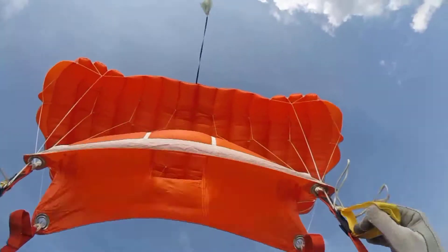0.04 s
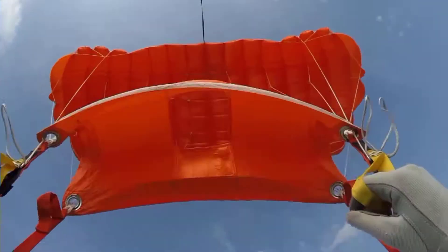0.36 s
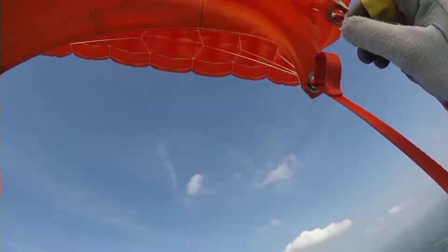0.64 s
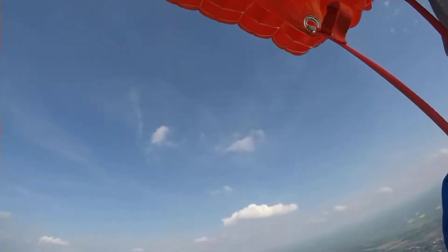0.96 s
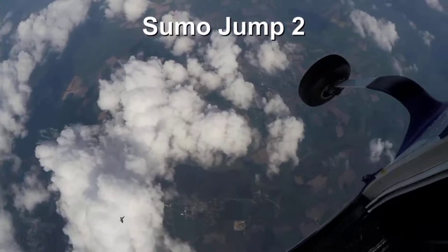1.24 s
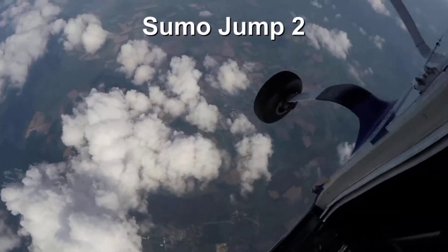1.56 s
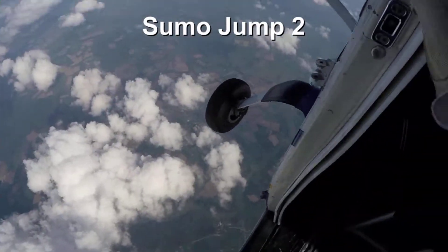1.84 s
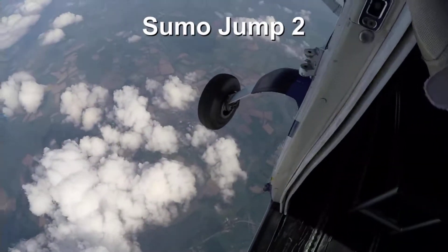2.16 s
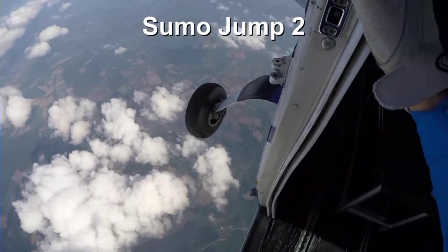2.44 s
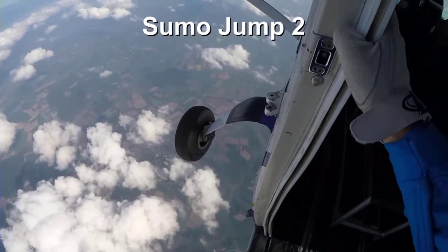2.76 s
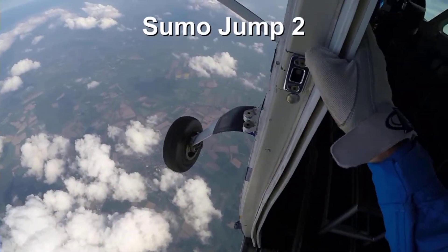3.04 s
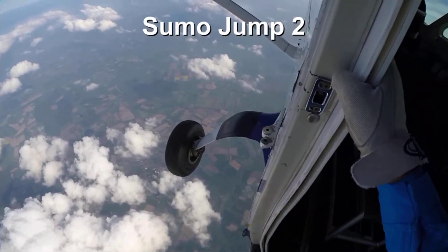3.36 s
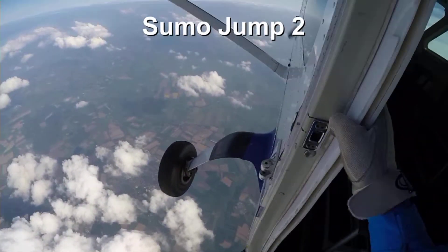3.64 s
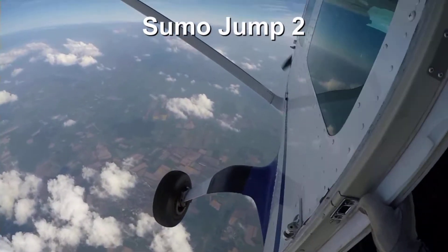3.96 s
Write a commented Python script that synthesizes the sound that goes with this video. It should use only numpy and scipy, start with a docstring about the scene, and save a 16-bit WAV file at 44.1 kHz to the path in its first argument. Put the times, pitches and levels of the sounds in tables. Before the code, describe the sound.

Wind thumps softly on the microphone under an open parachute while cloth rustles and snaps. It changes abruptly to a loud, steady rush buffeting the open door of a small aircraft in flight, with a propeller droning underneath.

```python
"""Gusts thump on a helmet camera under an open parachute; the slider's cloth rustles and snaps, and a
gloved hand slides along it. Then a hard cut to the open door of a small aircraft in flight: the
slipstream buffets and rushes, ringing in the door frame and the camera housing and howling briefly
on an edge, over the half-buried drone of the propeller."""
import sys
import numpy as np
from scipy import signal
from scipy.fft import rfft, irfft
from scipy.io import wavfile
from scipy.ndimage import uniform_filter1d

SR = 44100
rng = np.random.default_rng(int(sys.argv[2]) if len(sys.argv) > 2 else 0)


def inscribe(sig):
    """Save sig as 16-bit PCM at rate SR to the path in sys.argv[1].

    A 1-D sig is mono; a 2-D sig holds one channel per row.
    Samples are clipped to [-1, 1] before scaling.
    """
    pcm = np.round(np.clip(np.atleast_2d(sig).T, -1, 1) * 32767)
    wavfile.write(sys.argv[1], SR, pcm.astype(np.int16))


N = 176400
TIME = np.arange(N) / SR


def from_db(db):
    return 10 ** (np.asarray(db) / 20)


def in_time(rows):
    """One envelope per level column of a breakpoint table."""
    times, *columns = np.transpose(rows)
    return [np.interp(TIME, times, column) for column in columns]


def filtered_noise(gain_at):
    """White noise through a frequency response; rms 1."""
    hz = np.maximum(np.arange(N // 2 + 1) * SR / N, 1)
    x = irfft(rfft(rng.standard_normal(N)) * gain_at(hz), N)
    return x / np.sqrt(np.mean(x ** 2) + 1e-20)


def noise(colour):
    """Noise with a spectrum of (f/Hz, level/dB) points, falling steeply beyond both ends; rms 1."""
    points_hz, db = np.transpose(colour)

    def gain_at(hz):
        skirts = np.minimum(1, np.minimum(hz / points_hz[0], points_hz[-1] / hz)) ** 4
        return from_db(np.interp(np.log(hz), np.log(points_hz), db)) * skirts
    return filtered_noise(gain_at)


def resonance(centre_hz, width_hz):
    """A narrow, ringing band of noise; rms 1."""
    return filtered_noise(lambda hz: 1 / (1 + ((hz - centre_hz) / width_hz) ** 2))


def drift(rate_hz):
    """Random modulation up to about the given rate; rms 1."""
    return resonance(0, rate_hz)


def steadied(x, samples):
    """Evens out the chance swells of a rumble."""
    return x / np.sqrt(uniform_filter1d(x ** 2, samples) + 1e-9)


def swell(centre_s, width_s):
    """A bell-shaped rise and fall."""
    return np.exp(-.5 * ((TIME - centre_s) / width_s) ** 2)


def canopy_gusts():
    """Lumpy gusts hit the microphone; a faint treble hiss, like audio-coder noise, follows their peaks."""
    # gust envelopes: t/s, thump level/dB, rumble level/dB
    levels = [(0, -30, -34.5), (.15, -22, -28), (.2, -26, -30.5), (.26, -17.5, -31), (.32, -29, -29),
              (.41, -28.5, -33.5), (.44, -26, -25), (.49, -41, -34), (.65, -32, -33.5), (.75, -41, -37.5),
              (.79, -23.5, -42), (.82, -34, -40), (.86, -27.5, -36), (.96, -39.5, -44), (1.13, -32, -37.5),
              (1.21, -36, -40)]
    # spectra of the three layers: f/Hz, level/dB
    thump_colour = [(15, -15), (25, -2.5), (42, 4), (65, 1), (82, -12), (120, -26)]
    rumble_colour = [(70, -7), (100, -4.5), (145, 0), (185, -6), (230, -14.5), (280, -15.5), (345, -22.5),
                     (420, -34.5), (700, -38)]
    coder_hiss_colour = [(4000, -6), (8000, 0), (16000, -1)]
    thump_db, rumble_db = in_time(levels)
    gusts = from_db(thump_db) * steadied(noise(thump_colour), samples=2000)
    gusts += from_db(rumble_db) * steadied(noise(rumble_colour), samples=2000)
    coder_hiss = from_db(-36.5) * np.abs(gusts) ** 1.23 * noise(coder_hiss_colour)
    return gusts + coder_hiss


def canopy_airflow():
    """A soft bed of air streaming past the camera."""
    # airflow fading in: t/s, level/dB
    levels = [(0, -59), (.4, -46.5), (.7, -40), (.86, -43), (.97, -41), (1.21, -39.5)]
    # airflow spectrum: f/Hz, level/dB
    colour = [(300, 0.5), (450, -8), (700, -7.5), (1200, -6), (1500, -3), (2000, -3), (2700, -4.5),
              (3200, 0), (3600, -2.5), (4200, -14.5), (5000, -20.5), (5800, -11), (6400, -14),
              (7100, -21.5), (8700, -24.5), (10000, -30), (16000, -40)]
    air_db, = in_time(levels)
    return from_db(air_db + .8 * drift(rate_hz=40)) * noise(colour)


def cloth_rustle(flutter):
    """Cloth and lines rub; a thin squeak joins in partway."""
    # rubbing envelope: t/s, level/dB
    levels = [(0, -48), (.14, -45.5), (.2, -41), (.27, -42.5), (.36, -38), (.44, -33.5), (.53, -35.5),
              (.65, -38.5), (.75, -37), (.79, -44), (.86, -70)]
    # rubbing spectrum: f/Hz, level/dB
    colour = [(300, -10), (600, -12.5), (1000, -6.5), (1250, -4), (1500, -3), (2000, -3), (2700, -5.5),
              (3200, 1.5), (3600, -2), (4200, -17.5), (5000, -23), (5600, -15.5), (6000, -13), (6450, -19),
              (6900, -31), (9000, -34), (11000, -40), (16000, -48)]
    cloth_db, = in_time(levels)
    squeak = from_db(-13) * (TIME > .4) * resonance(centre_hz=6050, width_hz=280)
    return flutter * from_db(cloth_db) * (noise(colour) + squeak)


def cloth_flutter():
    """The fast, ragged gain of fluttering cloth, deepest at the start."""
    # flutter: t/s, rms depth/dB
    depths = [(0, 3.4), (.3, 3.1), (.45, 0.99), (.8, 1.1)]
    depth_db, = in_time(depths)
    return from_db(depth_db * drift(rate_hz=90))


def cloth_snaps():
    """Short snaps of the cloth, each a dull body with a bright edge."""
    # snaps: t/s, level/dB, edge against body/dB
    snaps = [(0.027, -35, -28), (0.034, -34, -31), (.181, -32.5, -14), (0.2056, -34.5, -3.5),
             (0.231, -30.5, -18), (.3097, -30, -20), (.318, -39, -8), (0.3338, -24.5, -16),
             (0.34, -24.5, -4), (.3716, -29, -15), (.384, -25, -22), (0.742, -25.5, -31),
             (0.8974, -30, -28)]
    # spectra of body and edge: f/Hz, level/dB
    body_colour = [(400, -15), (800, 0), (1400, -0.5), (2400, 1), (3400, 2), (4200, -17), (6000, -26),
                   (8000, -34)]
    edge_colour = [(4000, -8), (5500, 2), (6400, 8), (7500, -12), (8700, -16), (10000, -12), (12000, -20),
                   (16000, -26)]
    attack_s, decay_s = 0.00042, 0.0034
    body, edge = noise(body_colour), noise(edge_colour)
    out = np.zeros(N)
    for start_s, db, edge_db in snaps:
        age = np.maximum(TIME - start_s, 0)
        envelope = (1 - np.exp(-age / attack_s)) * np.exp(-age / decay_s)
        out += from_db(db) * envelope * (body + from_db(edge_db) * edge)
    return out


def glove_swish(flutter):
    """One bright swish as the glove slides along the fluttering cloth."""
    # swish spectrum: f/Hz, level/dB
    colour = [(4000, -10), (6500, -2), (7800, 4), (8500, -3), (9400, 1), (11200, -2), (12000, -8),
              (13000, -4), (14000, -13), (16000, -17)]
    return flutter * from_db(-54.5) * swell(centre_s=0.477, width_s=.05) * noise(colour)


def slipstream(blade_phase):
    """Air buffets, rumbles and rushes past the door; eddies, buffets and blades all shake the rush."""
    # layer envelopes: t/s, then level/dB of buffet, rumble, low rush, rush, hiss
    levels = [(1.21, -23, -24.5, -30, -24.5, -41), (1.5, -23, -23.5, -27.5, -24.5, -43),
              (1.75, -23.5, -24, -33.5, -23.5, -45.5), (2, -32, -23.5, -32, -25, -45),
              (2.2, -22.5, -24, -31.5, -24.5, -44), (2.7, -25, -26, -33, -25, -48),
              (3.3, -21.5, -25.5, -33, -24.5, -48), (3.7, -22, -27.5, -36, -24.5, -47.5),
              (4, -20.5, -29, -35.5, -25, -46.5)]
    # spectra of the five layers: f/Hz, level/dB
    buffet_colour = [(15, -25), (28, -2), (44, -4), (65, 2.5), (88, -0.5), (125, -4.5), (170, -12),
                     (300, -29)]
    rumble_colour = [(90, -7.5), (135, 2), (175, -1), (230, -3), (290, -6.5), (345, -16.5), (460, -20.5),
                     (600, -24.5), (900, -37)]
    low_colour = [(150, 2.5), (300, 1.5), (450, 0.5), (620, -2), (950, 0.5), (1250, -3.5), (1700, -5),
                  (3000, -35)]
    rush_colour = [(700, -9), (1250, -13.5), (1500, -3), (1900, -2.5), (2350, -3.5), (2850, -1.5),
                   (3250, 1), (3600, -3), (3900, -9.5), (4150, -16), (4900, -18.5), (5250, -13.5),
                   (5600, -16), (6100, -14), (6450, -22), (7400, -23), (9000, -29)]
    hiss_colour = [(4000, -28), (6500, -4), (7500, 3), (8500, -6.5), (9100, 1.5), (9600, -1.5),
                   (10200, 0.5), (11500, -3.5), (12800, -0.5), (13500, -9), (16000, -15)]
    # ringing of door frame and camera housing: f/Hz, width/Hz, level against the rush/dB
    cavities = [(1740, 91, -12), (2100, 150, -9), (2592, 90, -8.5), (4605, 120, -22), (5933, 176, -14.5)]
    buffet_db, rumble_db, low_db, rush_db, hiss_db = in_time(levels)
    buffet = steadied(noise(buffet_colour), samples=4000)
    rumble = steadied(noise(rumble_colour), samples=4000)
    ringing = sum(from_db(db) * resonance(hz, width_hz) for hz, width_hz, db in cavities)
    air = from_db(rush_db) * (noise(rush_colour) + ringing) + edge_howls()
    air += from_db(low_db) * noise(low_colour) + from_db(hiss_db) * noise(hiss_colour)
    eddies = drift(rate_hz=120)
    shake_db = 0.64 * eddies + buffet + 0.44 * np.sin(blade_phase)
    return from_db(buffet_db) * buffet + from_db(rumble_db) * rumble + from_db(shake_db) * air


def propeller(blade_phase):
    """The passing blades drone in three wavering harmonics."""
    # the drone grows as the camera turns forward: t/s, level/dB
    levels = [(1.21, -40), (2.4, -28.5), (3.2, -26), (4, -30.5)]
    # harmonics: multiple of the blade rate, level/dB
    harmonics = [(1, -1.5), (2, -18), (3, -19)]
    drone_db, = in_time(levels)
    drone = np.zeros(N)
    for order, db in harmonics:
        gain = from_db(drone_db + db + 1.8 * drift(rate_hz=12))
        drone += gain * np.sin(order * blade_phase + rng.uniform(0, 2 * np.pi))
    return drone


def edge_howls():
    """Air catches an edge and howls for a moment, first low, then high."""
    # howls: t/s, width/s, f/Hz, width/Hz, level/dB
    howls = [(1.42, 0.17, 420, 101, -32.5), (1.675, 0.058, 1700, 130, -25)]
    return sum(from_db(db) * swell(centre_s, width_s) * resonance(hz, width_hz)
               for centre_s, width_s, hz, width_hz, db in howls)


def scene():
    """Under the canopy, then a hard cut to the aircraft door; mono."""
    cut_s, blade_hz, blade_wander = 1.2095, 103.26, 0.00772
    wind = canopy_gusts() + canopy_airflow()
    flutter = cloth_flutter()
    cloth = cloth_rustle(flutter) + cloth_snaps() + glove_swish(flutter)
    pitch_hz = blade_hz * (1 + blade_wander * drift(rate_hz=2.48))
    blade_phase = 2 * np.pi * np.cumsum(pitch_hz) / SR
    door = slipstream(blade_phase) + propeller(blade_phase)
    return np.where(TIME < cut_s, wind + cloth, door)[None]


def record(dry):
    """Soft overload rounds the peaks; a steep low-pass takes off the very top."""
    ceiling, cutoff_hz = 0.58, 15850
    rounded = ceiling * np.tanh(dry / ceiling)
    low_pass = signal.ellip(12, .1, 80, cutoff_hz, fs=SR, output="sos")
    return signal.sosfilt(low_pass, rounded)


dry = scene()
out = record(dry)
inscribe(out)
```